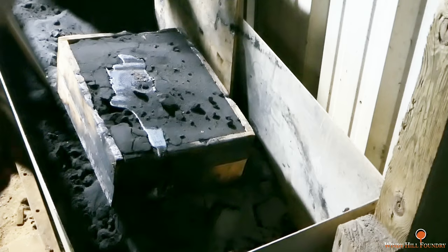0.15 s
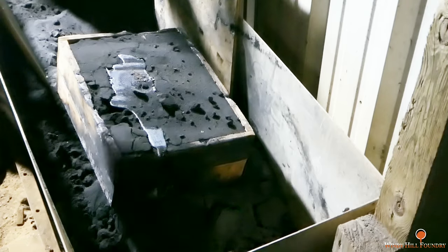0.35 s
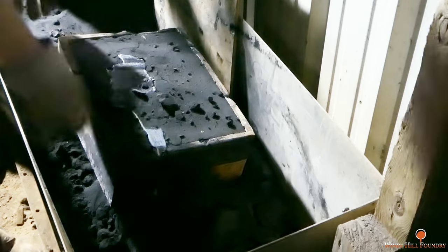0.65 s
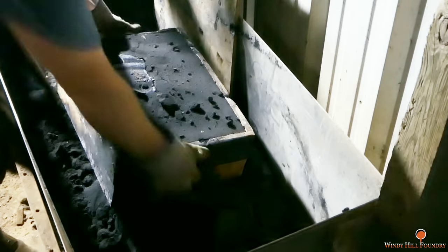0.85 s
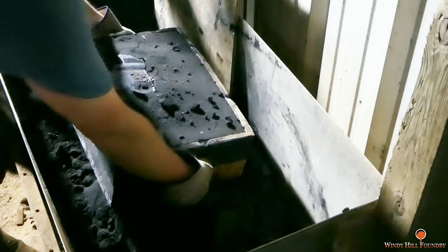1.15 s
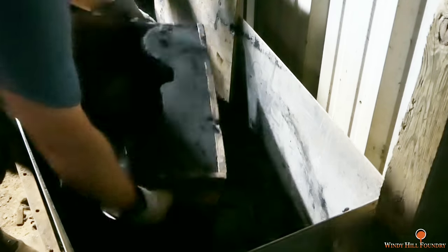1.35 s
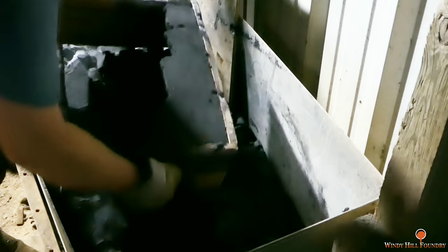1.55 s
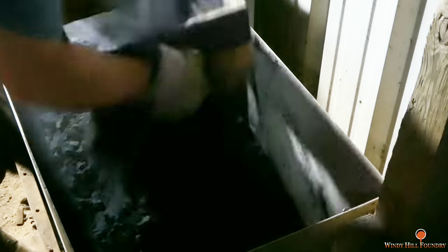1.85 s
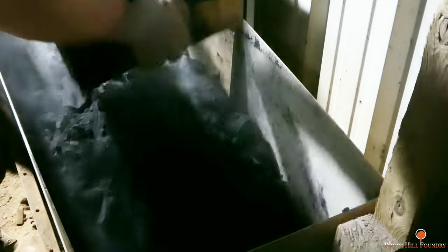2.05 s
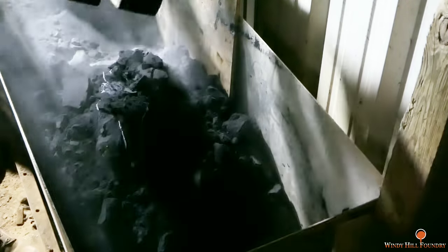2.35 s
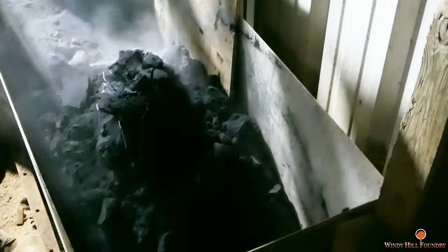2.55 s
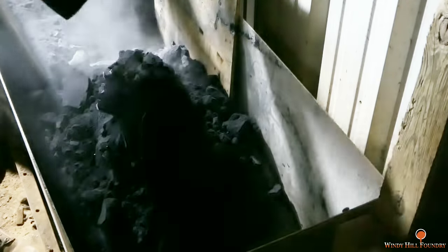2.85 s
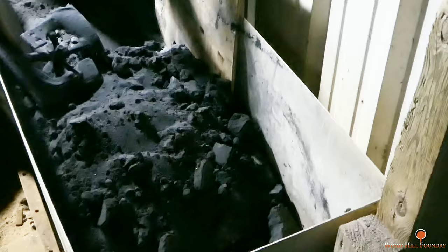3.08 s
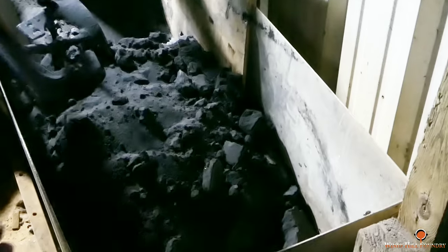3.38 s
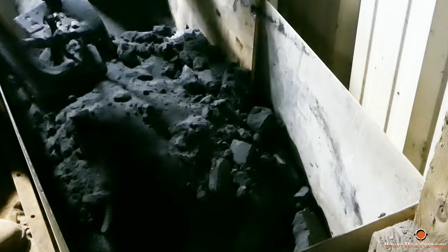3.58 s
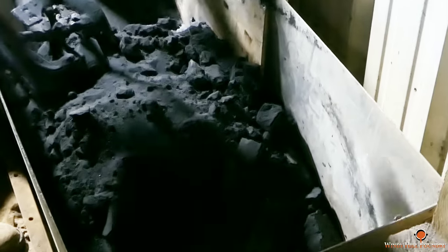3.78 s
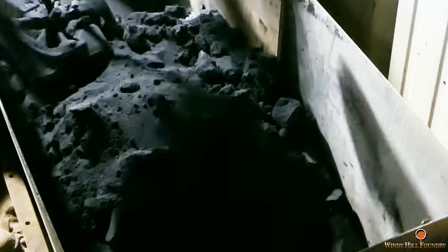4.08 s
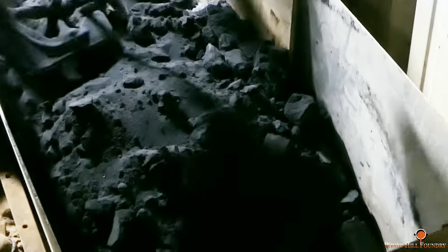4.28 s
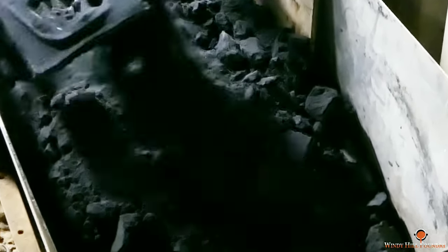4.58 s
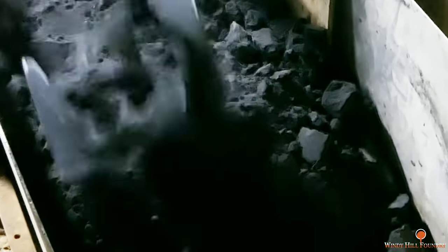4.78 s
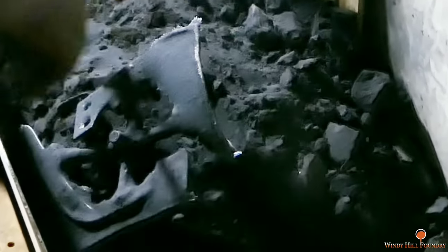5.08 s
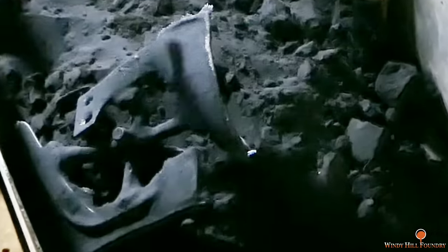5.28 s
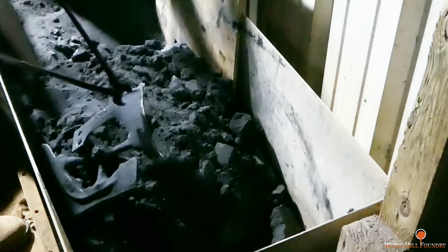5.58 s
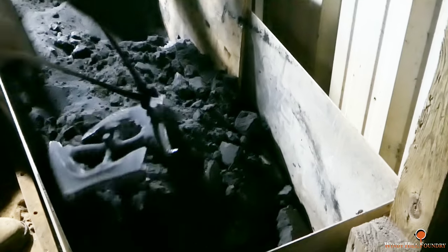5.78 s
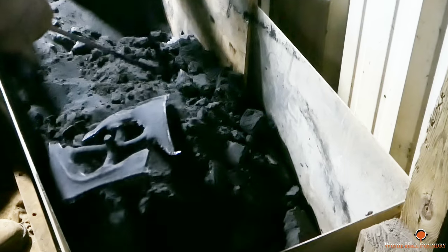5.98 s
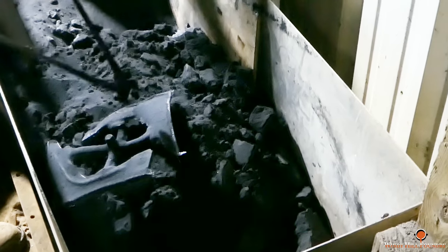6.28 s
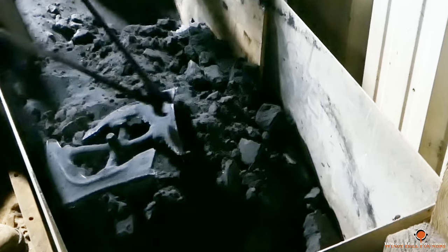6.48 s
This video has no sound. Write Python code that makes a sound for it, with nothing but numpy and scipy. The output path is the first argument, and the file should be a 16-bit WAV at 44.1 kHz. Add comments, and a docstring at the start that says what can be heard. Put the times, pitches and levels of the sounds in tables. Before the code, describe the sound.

Close stereo microphone beside an open-air sand bin: glove scuffs, wooden knocks and a bright pin tick, then clods and crumbs spilling. Three or so sharp wood blows dominate and echo briefly in the yard. Tongs dig with bright clacks and grinding sand, two castings clank and ring, and a gritty squealing grip ends the action. Steady thin insect rasp and faint air drop lower in two steps.

```python
"""A wooden moulding flask is knocked clean: filtered noise bursts and damped modes, plus a ringing steel pin.
It is lifted off a sand mould in an outdoor bin; damp sand slumps out as random clods, crumbs and grains.
Steel tongs dig out two metal castings, which clink, ring and drop back: clacks, decaying modes and scrapes.
Insects buzz high in the yard, as noise shallowly pulsed at the wing-stroke rate, over faint air.
The last two seconds run in slow motion, in two steps: the buzz and the ringing fall in pitch."""
import sys
import numpy as np
from scipy import signal
from scipy.fft import rfft, irfft, next_fast_len
from scipy.io import wavfile
from scipy.ndimage import map_coordinates

SR = 44100
rng = np.random.default_rng(int(sys.argv[2]) if len(sys.argv) > 2 else 0)


def dump(signal):
    """Clip the signal to [-1, 1] and save it as 16-bit WAV at the path in sys.argv[1]."""
    limited = np.clip(np.atleast_2d(signal).T, -1, 1)
    pcm = np.round(limited * 32767).astype(np.int16)
    wavfile.write(sys.argv[1], SR, pcm)


N = 292824
T = np.arange(N) / SR
TAIL = T[:SR]


def amp(db):
    """Decibels to gain."""
    return np.exp(np.asarray(db) * (np.log(10) / 20))


def unit(x):
    """Scale to rms 1."""
    return x / np.sqrt(np.mean(x ** 2))


def add(track, s, sound):
    """Mix a sound into a track at a time."""
    start = max(int(s * SR), 0)
    track[start:start + len(sound)] += sound[:N - start]


def colour(x, points):
    """Filter by a spectrum of (hz, db) points, interpolated over log frequency."""
    hz, db = np.transpose(points)
    size = next_fast_len(len(x))
    bins_hz = np.maximum(np.fft.rfftfreq(size, 1 / SR), 1)
    gain = amp(np.interp(np.log(bins_hz), np.log(hz), db))
    return irfft(rfft(x, size) * gain, size)[:len(x)]


def band(x, hz, q):
    """Two-pole resonance, gain 1 at the centre."""
    g = np.tan(np.pi * min(hz / SR, .45))
    b, a = signal.bilinear([g / q, 0], [1, g / q, g * g], .5)
    return signal.lfilter(b, a, x)


def through(x, response):
    """Play a sound through an impulse response of unit energy."""
    return signal.fftconvolve(x, response / np.linalg.norm(response))[:N]


def burst(t60_s):
    """Noise that dies away: many crowded, well-damped modes."""
    return rng.standard_normal(SR) * amp(-60 * TAIL / t60_s)


def ring(modes, scatter_db, length=1):
    """Decaying modes; each point of contact favours different ones."""
    longest_s = length * max(mode[2] for mode in modes)
    t = TAIL[:int(min(1, longest_s) * SR)]
    out = np.zeros(SR)
    for hz, db, t60_s in modes:
        level_db = db + scatter_db * rng.standard_normal()
        decay = amp(level_db - 60 * t / (t60_s * length))
        out[:len(t)] += decay * np.sin(2 * np.pi * hz * t) * rng.choice([-1, 1])
    return out


def walk(rate_hz):
    """Smooth chance with a spread near 1."""
    knots = rng.standard_normal(int(N / SR * rate_hz) + 2)
    return np.interp(T * rate_hz, np.arange(len(knots)), knots)


def grains(rate_per_s, spread_db):
    """Random tiny impacts of exponentially spread decibel size."""
    sizes = amp(spread_db * np.minimum(rng.exponential(size=N), 4))
    hits = rng.random(N) < rate_per_s / SR
    return unit(hits * sizes * rng.choice([-1, 1], N))


def pressure(slides):
    """Each slide swells and fades."""
    return sum(amp(db) * np.exp(-((T - s) / half_s) ** 2) for s, half_s, db in slides)


# slow motion: start_s, playback_speed
SLOW_STEPS = [(4.558, .75), (5.607, .5)]


def slowed(x):
    """Read a sound more slowly after each slow-motion step, which lowers its pitch."""
    speed = np.ones(N)
    for s, value in SLOW_STEPS:
        speed[T >= s] = value
    position = np.cumsum(speed) - speed[0]
    return map_coordinates(signal.resample_poly(x, 2, 1), [2 * position], order=3)


# knocks on flask and bin, and low thumps of castings landing on sand: start_s, level_db, centre_hz, t60_s
KNOCKS = [(0.2041, -25.5, 1400, 0.039), (0.778, -15.5, 1790, 0.026), (0.7999, -10, 1220, 0.029),
          (0.812, -19, 3530, 0.031), (.87, -30, 4200, .005), (0.884, -25, 3840, 0.0051),
          (1.141, -35, 1700, 0.025), (1.191, -36, 1800, 0.025), (1.7099, -7, 1090, 0.087),
          (1.835, -21.5, 1250, 0.046), (2.04, -28, 4070, .025), (2.573, -16, 1110, 0.19),
          (2.6245, 0.5, 2050, 0.016), (2.632, -1, 1590, 0.068), (2.8021, 4.5, 1770, 0.026),
          (2.9314, 1.6, 2360, 0.029), (3.264, -8, 2150, 0.0036), (3.267, -12.5, 1340, 0.15),
          (3.289, -28, 1400, 0.046), (3.746, -23.5, 2800, 0.015), (4.231, -26.5, 455, 0.16),
          (4.427, -37, 330, 0.092), (4.961, -32.5, 230, 0.15), (5.6, -26.5, 600, 0.1),
          (5.768, -20, 300, 0.11)]
# wood modes: pitch_hz, level_db, t60_s
WOOD_MODES = [(478.6, -7, 0.18), (1055, 13.5, 0.0094), (1140, -17, 0.23), (1340, -0.5, 0.0064),
              (1880, 7, 0.014), (2218, -8, 0.066), (2450, -3, 0.0073), (3170, -56, 0.021),
              (4030, 17.5, 0.0092), (4960, 5, 0.032)]
# flask slide: middle_s, half_length_s, rms_db
FLASK_SLIDES = [(2.4, 0.05, -27)]
# slide spectrum: freq_hz, level_db
FLASK_RUB = [(880, -43), (1500, -17), (1960, -15), (2430, -26), (2970, -15.5), (3210, -23), (3640, -4),
             (4330, -8), (4680, -1.5), (6060, -15.5), (7350, -25), (8180, -8), (8920, -28), (11200, -19),
             (15000, -39)]
KNOCK_Q_AT_1_KHZ, KNOCK_Q_PER_OCTAVE = 0.78, 1.33
WOOD_SCATTER_DB, WOOD_MAX_STRETCH = 2.5, 1.6
# frame held clear of the bin: more of each knock reaches the yard
CLEAR_FROM_S, CLEAR_TO_S = 2.5, 3.1
ECHO_IN_BIN_DB, ECHO_CLEAR_DB = -11, -3.5


def flask_and_thumps():
    """Dead knocks and low thumps, modes plus noise in a band, and a hissing slide; returns direct and yard send."""
    direct, sent = np.zeros(N), np.zeros(N)
    for s, db, hz, t60_s in KNOCKS:
        q = KNOCK_Q_AT_1_KHZ * KNOCK_Q_PER_OCTAVE ** np.log2(hz / 1000)
        modes = ring(WOOD_MODES, WOOD_SCATTER_DB, length=min(t60_s / 0.042, WOOD_MAX_STRETCH))
        body = band(modes + amp(13.5) * burst(t60_s), hz, q)
        # soft limiting rounds the crest of the blow
        knock = band(np.tanh(2 * body / np.abs(body).max()), hz, q)
        first_5_ms = knock[:SR // 200]
        knock *= amp(db - 12.5) / np.std(first_5_ms)
        add(direct, s, knock)
        # the yard hears all sides at once, so the single modes even out
        echo_db = ECHO_CLEAR_DB if CLEAR_FROM_S < s < CLEAR_TO_S else ECHO_IN_BIN_DB
        spread = band(signal.unit_impulse(SR), 0.99 * hz, 1.15 * q)
        add(sent, s, spread * amp(echo_db) * np.std(knock) / np.std(spread))
    slide = unit(colour(rng.standard_normal(N), FLASK_RUB)) * pressure(FLASK_SLIDES)
    return direct + slide, sent + amp(-3.5) * slide


def struck(modes, hits, scatter_db, crowd_db):
    """Metal on metal: short bright clack, crowd of brief overtones, then the main modes ring on."""
    out = np.zeros(N)
    for s, clack_db, hz, t60_s, ring_db in hits:
        overtones = [(f_hz, 0, .1) for f_hz in rng.uniform(494.5, 15500, size=48)]
        crowd = ring(overtones, scatter_db=7.5) / np.sqrt(len(overtones))
        clack = band(burst(t60_s) + amp(crowd_db) * crowd, hz, q=0.57)
        add(out, s, amp(clack_db - 16.5) * clack + amp(ring_db) * ring(modes, scatter_db))
    return out


def scraped(modes, slides, grit_db, chatter_db):
    """Sand caught between steel and casting grinds, slips in jerks and keeps the metal singing."""
    jerks = amp(chatter_db * walk(70))
    grit = grains(rate_per_s=4900, spread_db=-1.5) * jerks * pressure(slides)
    # such small contacts hardly move the lowest modes
    singing = through(grit, band(ring(modes, scatter_db=0.0, length=0.3), hz=4470, q=0.053))
    return singing + amp(grit_db) * band(grit, hz=3200, q=1.0)


# pin modes: pitch_hz, level_db, t60_s
PIN_MODES = [(6620, -1.5, 0.27), (9000, 1, 0.13), (10250, 4, 0.11), (13700, -16, .2), (14700, -8, 0.12)]
# pin blows: start_s, clack_db, clack_hz, clack_t60_s, ring_db
PIN_HITS = [(0.634, -42, 6060, 0.035, -46), (.7775, -17.5, 8000, 0.07, -34.5),
            (0.792, -18, 5000, 0.049, -40), (0.963, -32, 6100, .03, -49.5)]


def pin():
    """Struck steel pin: bright clacks excite its high modes."""
    return struck(PIN_MODES, PIN_HITS, scatter_db=3.0, crowd_db=2.5)


# frame creaks: start_s, level_db
CREAKS = [(1.247, -33), (1.299, -32), (1.555, -26), (1.564, -26), (1.578, -27.5), (1.591, -29), (1.61, -33)]
# big clods: start_s, level_db, pitch_hz, t60_s, crumb_spray_db
CLOD_HITS = [(1.286, -42.5, 256, 0.25, -20), (1.509, -38, 600, .02, -2), (1.655, -30, 1840, 0.02, -4),
             (1.768, -25, 984, 0.038, -22), (1.872, -28, 1164, .035, -16), (1.911, -21.5, 1156, 0.043, -8),
             (1.944, -34.5, 1820, 0.036, 0.5), (1.981, -27, 1290, 0.039, -12), (1.996, -35, 546, 0.043, -7),
             (2.017, -31.5, 405, 0.048, -22), (2.041, -27, 1025, 0.048, -4), (2.054, -31.5, 457, 0.076, 2),
             (2.126, -32.5, 860, 0.064, -17), (2.14, -35, 240, 0.077, -10.5),
             (2.175, -28.5, 894, 0.039, -21), (2.186, -30, 392, 0.07, -1), (2.203, -25, 330, 0.045, -30),
             (2.223, -34, 426, 0.16, -15), (2.242, -28, 866, 0.044, -21), (2.247, -39, 213, 0.072, -20),
             (2.931, -22, 495, 0.05, -19), (3.43, -33.5, 478, 0.067, -18), (3.654, -33.5, 820, 0.041, -4),
             (4.262, -39.5, 234, 0.15, -24), (5.463, -41.5, 399, 0.05, -20),
             (5.524, -34.5, 685, 0.023, -15), (5.548, -35.5, 590, 0.043, -24),
             (5.601, -33.5, 656, 0.041, -8)]
CREAK_HZ, CREAK_T60_S, CREAK_GRIT_DB = 1323, 0.028, -10
SPRAY_T60_S = 0.041


def rap(hz, t60_s, grit_db):
    """A soft push gives a rough, damped thud around one note, and grit crackles on top."""
    t = TAIL[:SR // 5]
    thud = unit(band(rng.standard_normal(len(t)), hz, q=3.6))
    attack = 1 - np.exp(-t * hz)
    note = (0.92 * np.sin(2 * np.pi * hz * t) + 0.3 * thud) * attack
    crackle = rng.standard_normal(len(t)) * rng.exponential(size=len(t))
    grit = band(crackle, hz=3000, q=0.356)
    return note * amp(-60 * t / t60_s) + grit * amp(grit_db - 60 * t / SPRAY_T60_S)


def breakup():
    """The frame creaks in jerks as it takes the weight; the mould gives way in big clods that burst."""
    out = np.zeros(N)
    for s, db in CREAKS:
        hz = CREAK_HZ * (1 + 0.027 * rng.standard_normal())
        add(out, s, amp(db) * rap(hz, CREAK_T60_S, CREAK_GRIT_DB))
    for s, db, hz, t60_s, spray_db in CLOD_HITS:
        add(out, s, amp(db) * rap(hz, t60_s, spray_db))
    return out


# tong modes: pitch_hz, level_db, t60_s
TONG_MODES = [(1997, -11, 0.09), (3140, -15, 0.18), (4550, 10, 0.039), (4650, -5, 0.19), (5400, -22, 0.1),
              (6450, -12, 0.07), (6670, -8, 0.17), (6970, 3.5, 0.044), (7460, -1.5, 0.17),
              (7800, -5.5, 0.27), (8260, -8, 0.23), (8580, 1, 0.13), (8800, -13, 0.17), (9340, -0.5, 0.13),
              (10900, 1, 0.14), (11100, -1, 0.059), (11550, -2, 0.13), (12400, -9, 0.2), (13900, -3, 0.12),
              (14500, -7, 0.15), (15640, -3, 0.1), (15100, -1, 0.12)]
# tong blows: start_s, clack_db, clack_hz, clack_t60_s, ring_db
TONG_HITS = [(3.4232, -9.5, 9450, 0.02, -45), (3.4249, -6.5, 9300, 0.089, -43),
             (3.514, -24, 9000, .05, -55), (3.582, -15, 7950, 0.094, -56), (3.757, -27, 7000, .02, -52),
             (3.807, -23, 9000, 0.03, -47), (3.842, -27, 9000, 0.046, -51), (3.878, -27, 8000, 0.03, -45.5),
             (3.894, -35, 8000, .02, -49), (3.93, -24, 9000, .02, -48.5), (3.962, -29, 8000, .02, -60),
             (3.999, -25, 8000, 0.045, -49), (4.037, -14, 7500, 0.097, -43.5), (4.2, -20, 6500, 0.016, -66),
             (4.2307, -5, 8600, 0.055, -49), (4.247, -16.5, 7100, 0.3, -48), (4.3, -20.5, 7000, 0.065, -57),
             (4.4234, 1.5, 5000, 0.049, -36.5), (4.524, -5.5, 9000, 0.022, -53)]
# tong slides: middle_s, half_length_s, level_db
TONG_SLIDES = [(3.768, 0.022, -44), (3.894, 0.016, -50), (3.943, 0.018, -51), (4.163, 0.048, -52),
               (4.502, 0.095, -40)]


def tongs():
    """Steel tongs clack, scrape through sand and chatter."""
    hits = struck(TONG_MODES, TONG_HITS, scatter_db=6, crowd_db=-5.0)
    scrapes = scraped(TONG_MODES, TONG_SLIDES, grit_db=1.5, chatter_db=3.5)
    return hits + scrapes + chatter(count=16)


CHATTER_FROM_S, CHATTER_GAP_S = 3.7715, 0.0175
CHATTER_HZ, CHATTER_T60_S = 4580, 0.034
CHATTER_DB, CHATTER_WEAK_DB, CHATTER_GROWTH_DB_PER_S = -37.5, -4, 12


def chatter(count):
    """Sliding jaws bounce evenly, strong and weak in turn, harder as the grip tightens, near one note."""
    out = np.zeros(N)
    for k, (size_db, detune) in enumerate(rng.standard_normal((count, 2))):
        s = k * CHATTER_GAP_S
        hz = CHATTER_HZ * (1 + 0.015 * detune)
        envelope = (1 - np.exp(-TAIL / 0.0039)) * amp(-60 * TAIL / CHATTER_T60_S)
        note = np.sin(2 * np.pi * hz * TAIL) * envelope
        scratch = amp(-6.0) * band(burst(0.013), hz=7000, q=0.7)
        db = CHATTER_DB + CHATTER_WEAK_DB * (k % 2) + CHATTER_GROWTH_DB_PER_S * s + size_db
        add(out, CHATTER_FROM_S + s, amp(db) * (note + scratch))
    return out


# hinge modes: pitch_hz, level_db, t60_s
HINGE_MODES = [(6700, -8, 0.24), (8100, -4, 0.22), (9868, -1.5, 0.28), (12740, -3, 0.28), (14550, -4, 0.23),
               (15130, -5, 0.21)]
# hinge blow: start_s, clack_db, clack_hz, clack_t60_s, ring_db
HINGE_HITS = [(3.262, -25, 9800, 0.048, -40.5)]


def hinge():
    """Struck hinge: one clack and a high ring."""
    return struck(HINGE_MODES, HINGE_HITS, scatter_db=2, crowd_db=-9)


# first casting's modes: pitch_hz, level_db, t60_s
FIRST_MODES = [(3940, 3.5, 0.41), (4660, -4, 0.87), (6560, -21, 0.62), (7100, -20, 0.73), (7450, -10, 0.2),
               (7480, 8, 0.046), (8200, -12, 0.2), (11100, -19, 0.1)]
# first casting's blow: start_s, clack_db, clack_hz, clack_t60_s, ring_db
FIRST_HITS = [(4.539, -5, 8000, 0.045, -31.5)]


def first_casting():
    """First casting, lifted: one blow rings its modes."""
    return struck(FIRST_MODES, FIRST_HITS, scatter_db=3.0, crowd_db=-15.5)


# second casting's modes, already low for slow motion: pitch_hz, level_db, t60_s
SECOND_MODES = [(233.3, -17.5, 0.45), (1420, -15, 0.69), (1610, -9.5, 0.28), (2420, -19, 0.14),
                (2960, -12, 0.4), (3200, -8, 0.57), (3480, -14, 1.0), (4700, -16, 0.46), (5640, -11, 0.54),
                (6120, -9, 0.65), (6470, -14, 0.37), (7070, -7.5, 0.65), (7960, 3.5, 0.1),
                (8400, 2.5, 0.13), (8700, -15, 0.32), (9500, -16, .3), (10550, -21, .28), (11230, -16, .25),
                (11800, -15, .22), (12600, -8, 0.3)]
# second casting's blows: start_s, clack_db, clack_hz, clack_t60_s, ring_db
SECOND_HITS = [(4.9455, -10.5, 5840, 0.23, -39), (4.959, 1, 7900, 0.035, -33.5),
               (4.963, -5, 7500, 0.024, -45), (4.971, -23, 6000, 0.027, -34),
               (5.008, -9.5, 5970, 0.054, -58), (5.019, -16, 6540, 0.28, -49)]
# second casting's slides: middle_s, half_length_s, level_db
SECOND_SLIDES = [(4.98, 0.035, -44), (5.03, 0.022, -37), (5.075, 0.057, -44.5)]


def second_casting():
    """Second casting, dropped: blows ring its modes, and sand scrapes it."""
    hits = struck(SECOND_MODES, SECOND_HITS, scatter_db=-1.0, crowd_db=-8.0)
    return hits + scraped(SECOND_MODES, SECOND_SLIDES, grit_db=-13, chatter_db=6.0)


# gripped metal's modes, already low for slow motion: pitch_hz, level_db, t60_s
GRIPPED_MODES = [(152.3, 2, 0.18), (320, 1.5, 0.08), (764, -15, 0.81), (970, 5.5, 0.18), (1086, 0, 0.071),
                 (1965, -8.5, 0.94), (2083, 5, 0.1), (2202, -18, 0.46), (2290, 3, 0.18), (3150, -0.5, 0.12),
                 (3203, -8, 0.69), (3290, -17, 0.32), (3620, -1, 0.074), (3770, -17, 0.46),
                 (4764, -20, 0.38), (5260, -6, 0.65), (5610, 1, 0.16), (5500, -10, 0.3), (7000, -21, 0.35),
                 (7700, -8, 0.2), (8730, 7.5, 0.049), (10240, 7, 0.035)]
# grip blows: start_s, clack_db, clack_hz, clack_t60_s, ring_db
GRIP_HITS = [(5.766, -9, 3020, 0.05, -31.5), (5.772, 1.5, 3450, 0.034, -44),
             (5.787, -16, 4000, 0.33, -46.5), (5.845, -16, 4000, 0.19, -49), (5.918, -24, 5000, .03, -45),
             (5.945, -15, 3460, .04, -41.5)]
# grip slides: middle_s, half_length_s, level_db
GRIP_SLIDES = [(5.582, 0.036, -44), (5.925, 0.024, -34), (5.952, 0.045, -44)]


def gripped():
    """Gripped metal: blows and gritty scrapes on its modes, with less bass."""
    hits = struck(GRIPPED_MODES, GRIP_HITS, scatter_db=2.0, crowd_db=-11.5)
    scrapes = scraped(GRIPPED_MODES, GRIP_SLIDES, grit_db=9.5, chatter_db=1.5)
    return colour(hits + scrapes, [(60, -10), (130, -7.0), (10000, 0.5), (13000, -3)])


# squealing edges: middle_s, half_length_s, level_db, pitch_hz, q
SQUEALS = [(1.289, 0.027, -41, 1340, 8.6), (1.358, 0.021, -44, 5630, 14), (1.343, 0.029, -54, 4470, 6),
           (2.288, 0.0052, -39.5, 3690, 2.6), (5.049, 0.037, -46, 1434, 18), (5.402, 0.11, -62, 2350, 18),
           (5.457, 0.11, -55, 2960, 10), (5.945, 0.032, -30.5, 2296, 90), (5.946, 0.026, -41, 3540, 5.1),
           (5.962, 0.028, -39, 3160, 32)]
SQUEAL_JERK_DB = 4


def squeals():
    """A sliding edge catches: uneven stick and slip keeps one narrow resonance going for a moment."""
    out = np.zeros(N)
    for s, half_s, db, hz, q in SQUEALS:
        t = np.arange(-3 * half_s, 3 * half_s, 1 / SR)
        tone = unit(band(band(rng.standard_normal(len(t)), hz, q), hz, q))
        tone = unit(tone * amp(SQUEAL_JERK_DB * walk(70)[:len(t)]))
        add(out, s + t[0], amp(db) * tone * np.exp(-(t / half_s) ** 2))
    return out


CLOD_SIZE_RANGE_DB = 12  # smallest to largest lump


def thuds(rate_per_s, cycles):
    """Soft lumps land at random, each with its own size and pitch."""
    out, t = np.zeros(N), TAIL[:SR // 12]
    for when, size, pitch in rng.random((int(rate_per_s * N / SR), 3)):
        hz = 130 * 12 ** pitch
        age = hz * t / cycles
        thud = age * np.exp(-2 * age) * np.sin(2 * np.pi * hz * t)
        add(out, when * N / SR, amp(CLOD_SIZE_RANGE_DB * size) * thud)
    return out


# sand moved by flask or tongs: start_s, length_s, flow_db, coarseness_db
SPILLS = [(0.226, 0.074, -46, -3), (0.767, 0.046, -39, -2), (1.268, 0.065, -42, 0.5), (1.37, 0.3, -49, -2),
          (1.73, 0.2, -51, 6), (1.94, 0.21, -42.5, 0.5), (2.18, 0.2, -42, -2.5), (2.42, 0.3, -45, -7),
          (2.7, 0.23, -58, 0), (3.169, 0.063, -46, -8), (3.27, 0.014, -50, 6.5), (3.429, 0.34, -51.5, 0),
          (3.84, 0.35, -55.5, 6.5), (4.24, 0.017, -45.5, 3), (4.41, 0.081, -46.5, 5), (4.93, 0.18, -48, -8),
          (5.52, 0.15, -52.5, 2.5), (5.78, 0.21, -46.5, -4)]
SPILL_ATTACK_S = 0.048
SETTLING_FROM_S = 0.63  # once the flask is gripped, sand never quite rests


def attack(s):
    """Linear rise centred on a start time."""
    return np.clip((T - s) / SPILL_ATTACK_S + .5, 0, 1)


def flow(offset_db, fall_db_per_s, settling_db, coarse_weight):
    """Level of one sand size: each spill starts quickly, runs, and dies away to a faint settling."""
    power = (attack(SETTLING_FROM_S) * amp(settling_db)) ** 2
    for s, length_s, flow_db, coarse_db in SPILLS:
        release_db = fall_db_per_s * np.maximum(T - s - length_s, 0)
        level_db = flow_db + offset_db + coarse_weight * coarse_db - release_db
        power = power + (attack(s) * amp(level_db)) ** 2
    return np.sqrt(power)


SPURT_DB = 2.0


def spurts():
    """Uneven running of the sand."""
    return amp(SPURT_DB * walk(45))


# clod spectrum: freq_hz, level_db
CLOD_COLOUR = [(30, -46), (100, -66), (180, -16), (260, -2), (420, 4.5), (650, 11.5), (1000, 9),
               (2000, -51)]
# crumb spectrum: freq_hz, level_db
CRUMB_COLOUR = [(350, -16), (700, -10), (1100, 9.5), (1800, 6.5), (3000, 0), (5000, -3), (9000, -1.5),
                (16000, -58)]
# fine grain spectrum: freq_hz, level_db
GRAIN_COLOUR = [(1500, -29), (3000, -3.5), (4500, 5), (7000, 1), (10000, 4.5), (15000, -3)]
BIN_HZ = 411  # the bin wall's drum note
LUMP_RATE_PER_S, LUMP_HZ, LUMP_T60_S, LUMP_DB = 30, 1123, 0.1, 0
FINE_LOSS_DB_PER_COARSE_DB = 0.043


def sand():
    """Clods thud on the bin, hard lumps rap, crumbs crunch and fine grains trickle, in uneven spurts."""
    lumps = thuds(rate_per_s=520, cycles=1.22)
    clods = unit(colour(lumps + 2.6 * band(lumps, BIN_HZ, q=45), CLOD_COLOUR))
    rapping = through(grains(LUMP_RATE_PER_S, spread_db=3.5), burst(LUMP_T60_S))
    raps = unit(band(rapping, LUMP_HZ, q=0.73))
    # every crumb that breaks gives a few milliseconds of gritty noise
    breaking = through(grains(rate_per_s=1300, spread_db=5.0) ** 2, amp(-60 * TAIL / 0.016))
    crumbs = unit(colour(np.sqrt(np.abs(breaking)) * rng.standard_normal(N), CRUMB_COLOUR))
    fine = unit(colour(grains(rate_per_s=11000, spread_db=3.5), GRAIN_COLOUR))
    clod_flow = flow(offset_db=-3.1, fall_db_per_s=131, settling_db=-74, coarse_weight=1.0)
    crumb_flow = flow(offset_db=-2.96, fall_db_per_s=210, settling_db=-65, coarse_weight=0)
    fine_flow = flow(offset_db=-7.5, fall_db_per_s=35, settling_db=-66,
                     coarse_weight=-FINE_LOSS_DB_PER_COARSE_DB)
    thudding = clods * clod_flow
    crunch = slowed(crumbs + amp(LUMP_DB) * raps) * crumb_flow
    trickle = slowed(fine) * fine_flow
    return thudding * spurts() + crunch * spurts() + trickle * spurts()


# gloves and boards over sand: middle_s, half_length_s, level_db, centre_hz
SCUFFS = [(0.17, 0.011, -46.5, 2220), (0.234, 0.0098, -46, 2000), (0.27, .012, -44, 1460),
          (0.322, 0.015, -42, 1340), (0.567, 0.0045, -52, 4500), (0.658, 0.02, -38, 770),
          (0.781, 0.014, -38, 3400), (0.975, 0.037, -49, 2000), (1.299, 0.029, -44, 570),
          (1.36, 0.026, -39.5, 5500), (1.91, 0.016, -32.5, 2400), (2.012, 0.015, -38.5, 507),
          (2.108, 0.0064, -39.5, 3020), (2.203, 0.033, -41, 540), (2.347, 0.04, -40, 950),
          (2.623, 0.007, -25.5, 2020), (2.933, 0.014, -38, 570), (3.44, 0.02, -48, 563),
          (4.407, 0.0093, -36, 573), (4.483, 0.05, -46, 563), (4.924, 0.028, -43.5, 3350),
          (6.613, 0.029, -54, 707)]
SCUFF_Q, SCUFF_GRIT_DB = 0.55, -8
SCUFF_ROUGH_DB = 2.8  # grains catch and let go under the glove


def scuffs():
    """Each brush is a short swell of fine friction, coloured by what is rubbed, sweeping grit along."""
    out = np.zeros(N)
    for s, half_s, db, hz in SCUFFS:
        t = np.arange(-3 * half_s, 3 * half_s, 1 / SR)
        friction = rng.standard_normal(len(t)) * amp(SCUFF_ROUGH_DB * walk(348.5)[:len(t)])
        rub = unit(band(band(friction, hz, SCUFF_Q), hz, SCUFF_Q))
        add(out, s + t[0], amp(db) * rub * np.exp(-(t / half_s) ** 2))
    grit = unit(colour(grains(rate_per_s=14000, spread_db=8), GRAIN_COLOUR))
    return out + amp(SCUFF_GRIT_DB) * grit * pressure([row[:3] for row in SCUFFS])


YARD_HOLD_S, YARD_TREBLE_HOLD_S, YARD_TREBLE_HZ = 0.11, 0.13, 3170


def echo_fade(hold_s, t60_s):
    """Held level, then a long tail."""
    return np.exp(-(TAIL / hold_s) ** 2) + amp(-7.0 - 60 * TAIL / t60_s)


def yard():
    """Impulse response: scattered echoes hold level for a moment, then fade and grow duller."""
    noise = rng.standard_normal(SR)
    low = colour(noise, [(YARD_TREBLE_HZ / 2, 0), (YARD_TREBLE_HZ, -3), (2 * YARD_TREBLE_HZ, -24)])
    fading_low = low * echo_fade(YARD_HOLD_S, 1.0)
    fading_treble = (noise - low) * echo_fade(YARD_TREBLE_HOLD_S, 0.35)
    return (1 - np.exp(-TAIL / 0.016)) * (fading_low + fading_treble)


# insect spectrum before slowing: freq_hz, level_db
SONG_COLOUR = [(8000, -28.5), (9100, -13.5), (9700, -4.5), (10100, -10.5), (10430, 4), (10750, -5),
               (11150, 4.5), (11550, 1), (11900, -14), (12400, -39), (14000, -47)]


def insects():
    """A steady high rasp with a shallow pulse at the wing-stroke rate."""
    stroke_hz = 150.0 * (1 + 0.0028 * walk(7.0))
    phase = 2 * np.pi * np.cumsum(stroke_hz) / SR
    strokes = 1 + 0.207 * np.cos(phase) + 0.14 * np.cos(2 * phase + 1)
    rasp = unit(colour(rng.standard_normal(N), SONG_COLOUR))
    return rasp * strokes * amp(-45.5 + 0.083 * walk(6.4))


# open-air spectrum before slowing: freq_hz, level_db
AIR_COLOUR = [(25, -25), (60, -25), (120, -4), (190, -8.5), (400, 1), (1000, 1), (2500, -2.5), (4500, -2.5),
              (7000, -5), (12000, -7.5), (16000, -8.5)]


def air():
    """Faint outdoor rush: coloured noise of wandering level."""
    return unit(colour(rng.standard_normal(N), AIR_COLOUR)) * amp(-57.5 + 1.0 * walk(2.8))


# yard echo spectrum: freq_hz, level_db
YARD_COLOUR = [(150, -52), (450, -5.5), (700, -10.5), (1080, 2), (1400, -6.5), (2000, -4), (2550, -2.5),
               (3000, -8), (4000, -5.5), (5200, -11), (8000, -22), (15000, -62)]


def surroundings(sent):
    """Sound from many directions at once: loose sand, brushing, the yard's echo, insects and air."""
    brushes = scuffs()
    echo = colour(through(sent + amp(-4.5) * brushes, yard()), YARD_COLOUR)
    return sand() + brushes + echo + slowed(insects() + air())


# side-channel filter: freq_hz, gain_db
WIDTH = [(40, -1.5), (125, -4.5), (500, -8), (1200, -12), (8000, -12), (13000, -15)]


def scene():
    """Knocks, thumps and metal sound close by and central, with the yard spread around them."""
    knocks, sent = flask_and_thumps()
    # second casting and gripped metal lie wholly in slow motion: modes already low
    metal = slowed(pin() + tongs() + hinge() + first_casting()) + second_casting() + gripped()
    lighter = metal + squeals() + breakup()
    sent = sent + amp(-9.5) * lighter
    mid = knocks + lighter + surroundings(sent)
    # reflections off the bin walls reach the two microphones differently
    walls = colour(through(knocks + lighter, burst(0.063)), [(150, -1), (500, -0.5), (3000, 0.5)])
    side = colour(walls + surroundings(sent), WIDTH)
    return np.array([mid + side, mid - side])


HISS_DB = -68.5  # microphone noise, before the filters
TOP_HZ = 15600


def record(dry):
    """The recorder adds a faint hiss, thins the deepest bass and cuts the top."""
    noisy = dry + amp(HISS_DB) * rng.standard_normal(N)
    bass_cut = signal.butter(1, 35, "high", fs=SR, output="sos")
    top_cut = signal.ellip(10, .2, 80, TOP_HZ, fs=SR, output="sos")
    return signal.sosfilt(top_cut, signal.sosfilt(bass_cut, noisy))


dry = scene()
out = record(dry)
dump(out)
```